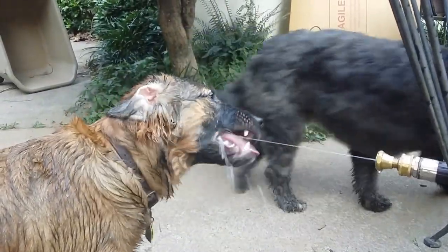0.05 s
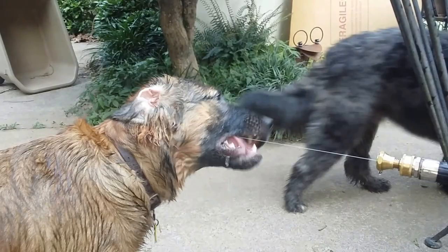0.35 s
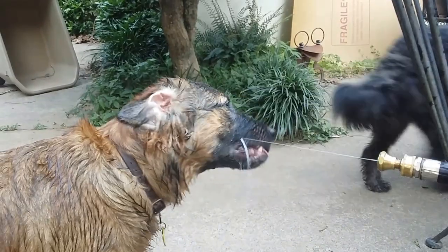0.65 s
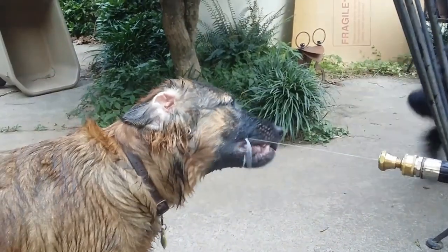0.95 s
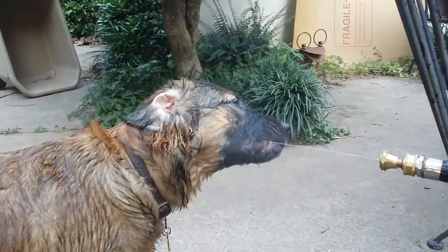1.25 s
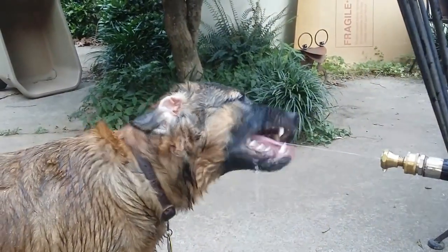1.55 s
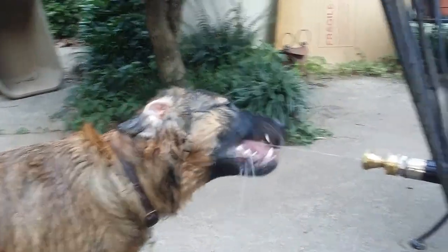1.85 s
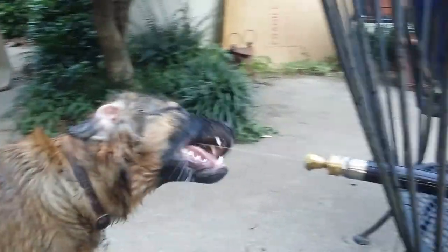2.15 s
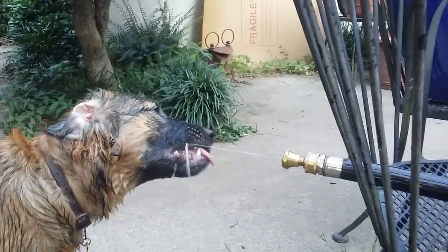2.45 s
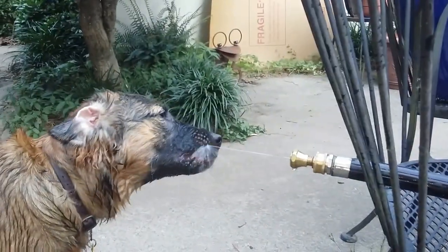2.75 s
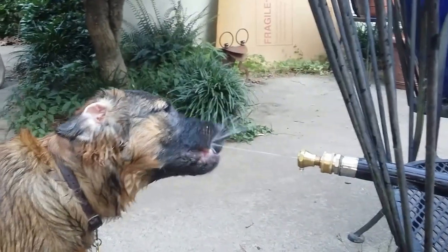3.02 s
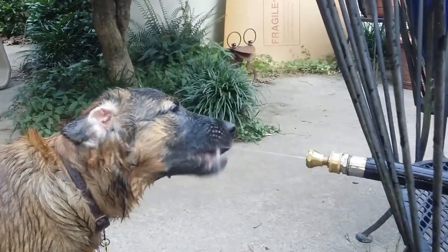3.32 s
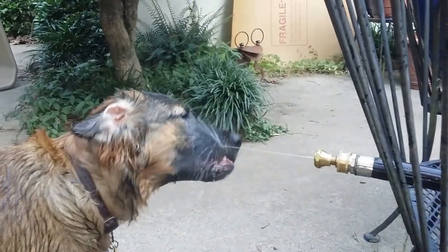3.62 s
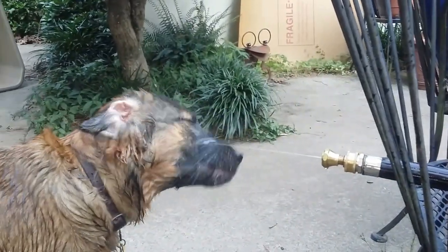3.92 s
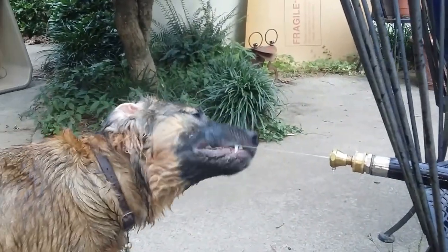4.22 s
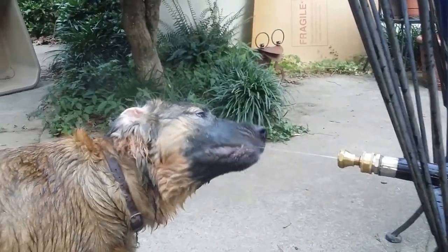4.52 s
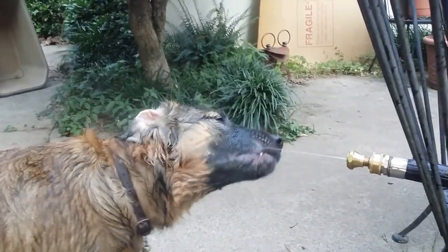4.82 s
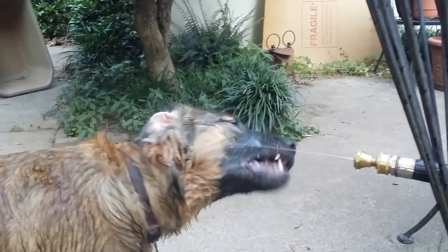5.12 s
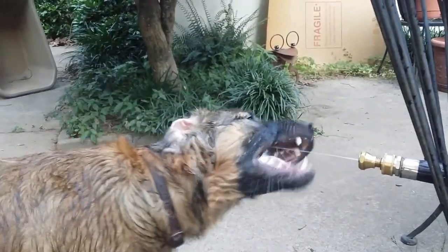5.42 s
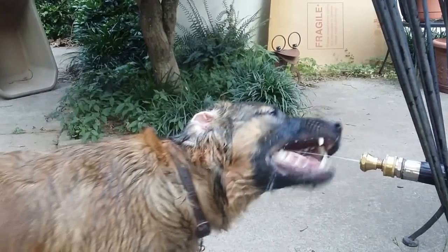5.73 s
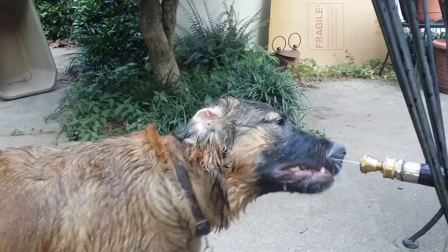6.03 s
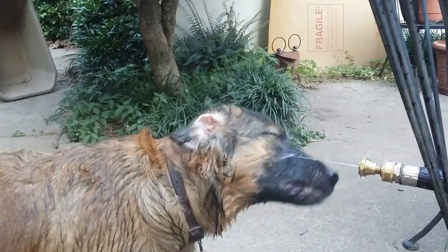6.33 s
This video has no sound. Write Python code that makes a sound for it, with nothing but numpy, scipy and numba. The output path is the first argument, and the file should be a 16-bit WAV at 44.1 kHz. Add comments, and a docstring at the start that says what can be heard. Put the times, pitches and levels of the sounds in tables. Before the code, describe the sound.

A dog laps and snaps at a thin hose jet close by, with spluttering spray, wet smacks and slurps over a faint, distant engine.

```python
"""A patio in a quiet garden: about a metre away, in mono, a dog laps and snaps at a thin hose jet.
The jet strikes muzzle and teeth in spurts and drums into small pockets of lip and cheek.
At each lap the mouth's ring rises as the jaw opens and falls to a squeak as it shuts.
Lips smack, the tongue plops, and a far engine drones past behind the garden."""
import sys
import numpy as np
from scipy import signal
from scipy.fft import rfft, irfft
from scipy.io import wavfile
from scipy.ndimage import uniform_filter1d
from numba import njit

SR = 44100
rng = np.random.default_rng(int(sys.argv[2]) if len(sys.argv) > 2 else 0)


def store_wav(level_fs):
    """Save 16-bit WAV to argv[1]."""
    pcm = np.round(np.clip(np.atleast_2d(level_fs), -1, 1) * 32767)
    wavfile.write(sys.argv[1], SR, pcm.T.astype(np.int16))


N = 285327
TIME = np.arange(N) / SR


def undb(db):
    """Decibels to gain."""
    return 10 ** (np.asarray(db) / 20)


def unit(x):
    """Scale to rms 1."""
    return x / np.sqrt(np.mean(x ** 2) + 1e-18)


def curves(table):
    """A table's columns as automation curves, one value a sample."""
    times, *columns = np.transpose(table)
    return [np.interp(TIME, times, column) for column in columns]


def colour(x, points):
    """Equalise by a curve of (pitch_hz, gain_db) points."""
    hz, db = np.transpose(points)
    bins_hz = np.fft.rfftfreq(len(x), 1 / SR)
    gain = undb(np.interp(np.log(bins_hz + 1e-3), np.log(hz), db))
    return irfft(rfft(x) * gain, len(x))


def band(x, lo_hz, hi_hz, order=2):
    """Band-pass."""
    return signal.sosfilt(signal.butter(order, [lo_hz, hi_hz], "band", fs=SR, output="sos"), x)


def walk(rate):
    """A random drift at rms 1 that takes a new course `rate` times a second."""
    step = int(SR / rate)
    held = np.repeat(rng.standard_normal(N // step + 1), step)
    return unit(uniform_filter1d(held, step)[:N])


@njit
def resonate(x, hz, width_hz):
    """State-variable band-pass whose centre can move every sample."""
    y, band_state, low_state = np.empty(len(x)), 0., 0.
    for i in range(len(x)):
        centre_hz = min(hz[i], .42 * SR)
        tuning, damping = np.tan(np.pi * centre_hz / SR), width_hz / centre_hz
        passed = (band_state + tuning * (x[i] - low_state)) / (1 + tuning * (tuning + damping))
        band_state = 2 * passed - band_state
        low_state += 2 * tuning * passed
        y[i] = damping * passed
    return y


def cavity(drive, hz, width_hz):
    """A steady or gliding resonance with steep skirts, at rms 1."""
    centre_hz = hz * np.ones(len(drive))
    ringing = resonate(drive, centre_hz, float(width_hz))
    return unit(resonate(ringing, centre_hz, 6.0 * width_hz))


def swell(start, length, rise, release_s):
    """A flow that swells over the share `rise` of its length, then dies: span, strength, progress 0-1."""
    span = slice(max(int(start * SR), 0), int((start + length + 5 * release_s) * SR))
    t = TIME[span] - TIME[span][0]
    attack = np.minimum(t / (max(rise, .01) * length), 1)
    release = np.exp(-np.maximum(t - length + release_s, 0) / release_s)
    return span, attack * release, np.minimum(t / length, 1)


def burst(x, length, db):
    """Give a short sound the energy of level `db` held for `length` seconds."""
    return undb(db) * unit(x) * np.sqrt(len(x) / (length * SR))


def droplets(rate, spread_db):
    """Drops land at random, `rate` a second; spread_db scatters their sizes."""
    hit = rng.random(N) < rate / SR
    size = undb(spread_db * np.minimum(rng.standard_exponential(N), 4))
    return unit(hit * size * rng.choice([-1, 1], N))


def jaw_strokes():
    """Each lap is two strokes: the jaw opens from parted lips to its widest, then shuts on the jet."""
    # laps: widest_s, opening_s, closing_s, widest_cavity_hz, final_cavity_hz,
    # opening_db, closing_db, spray_db, squeak_db (re closing)
    laps = [ (0.161, 0.13, 0.036, 1162, 1125, -53, -58.5, -60, 5.5),
            (.315, 0.072, 0.048, 1380, 1074, -54.5, -50.5, -37.5, -14),
            (.572, 0.026, 0.038, 1152, 850, -60, -56.5, -44, -2),
            (.925, 0.17, 0.087, 1554, 1000, -57, -44.5, -37.5, -10),
            (1.243, 0.094, 0.024, 1567, 1415, -57, -51, -42, -6),
            (1.361, 0.034, .05, 1210, 1230, -67, -54.5, -46, -17),
            (1.627, 0.12, 0.029, 1310, 1190, -57.5, -57, -54, -2),
            (1.742, 0.064, 0.076, 1650, 996, -59, -48, -44, -10),
            (2.068, 0.022, 0.068, 1597, 1050, -52, -41.5, -36.5, -26),
            (2.359, 0.1, 0.077, 1449, 962, -47, -39, -37, -7.5),
            (2.654, 0.037, .11, 1480, 920, -60, -49, -45.5, -18),
            (3.232, .03, 0.024, 1177, 964, -61, -54, -39, 1),
            (3.546, 0.055, 0.039, 1270, 937, -53, -51, -39, 1.5),
            (3.848, 0.031, 0.094, 1200, 947, -48.5, -51.5, -46.5, -22),
            (4.325, 0.061, .042, 1356, 948, -50, -53, -57, 3),
            (4.598, 0.051, 0.049, 1390, 972, -57.5, -47, -39, -2.5),
            (4.867, 0.077, 0.031, 1394, 968, -52.5, -54.5, -45, 1.5),
            (5.056, 0.041, 0.066, 1440, 1446, -59, -50.5, -44.5, -9),
            (5.158, .01, 0.034, 1043, 930, -68, -56.5, -42.5, 3),
            (5.344, 0.024, 0.066, 1600, 1304, -60.5, -48.5, -42, -12),
            (5.625, 0.18, 0.064, 1520, 1060, -48.5, -48, -39, -6),
            (5.848, 0.018, 0.06, 1557, 1362, -59.5, -53.5, -47, -12),
            (5.968, 0.017, 0.033, 1078, 1010, -76, -55, -40.5, 5),
            (6.243, 0.039, 0.0313, 1420, 1020, -56, -57.5, -40.5, -4)]
    parted_hz = 936
    for widest, open_s, close_s, wide_hz, end_hz, open_db, close_db, spray_db, squeak_db in laps:
        # start_s, length_s, rise_share, from_hz, to_hz, level_db, spray_db, squeak_db (re level)
        yield widest - open_s, open_s, 0.62, parted_hz, wide_hz, open_db, spray_db - 10.5, -9
        yield widest, close_s, 0.18, wide_hz, end_hz, close_db, spray_db, squeak_db


def jet_flows():
    """Strength of hiss, mist and froth: the grazing jet, strikes and jaw strokes add their power."""
    # the jet grazes the fur, until the dog moves up to the nozzle: time_s, level_db
    graze = [(0, -40), (.55, -53), (2.3, -49), (2.8, -50), (3.3, -51), (4.1, -43), (4.8, -48.5),
             (5.8, -44.5), (5.95, -55), (6.47, -60)]
    # the jet strikes muzzle, teeth or tongue:
    # start_s, length_s, rise_share, release_s, level_db, mist_db, froth_db (both re level)
    strikes = [(0.0, 0.13, 0.57, 0.011, -32.5, 0, -8), (0.11, 0.062, 0.67, 0.0084, -36.5, -7, -1),
               (0.227, 0.057, 0.44, 0.02, -41, -11.0, -7), (0.357, 0.16, 0.03, 0.096, -42, -8.5, 1),
               (0.585, 0.15, 0.26, 0.011, -42, -8, -5), (0.67, 0.18, 0.6, 0.025, -33.5, -2, -3),
               (1.022, 0.157, 0.33, 0.038, -33.0, -4.5, -5), (1.296, 0.1, 0.08, 0.031, -40.5, -7, -10),
               (1.411, 0.17, 0.47, 0.006, -37, -5, -4.5), (1.553, 0.085, 0.82, 0.011, -34.5, -3.0, -1.5),
               (1.74, 0.12, 0.9, 0.036, -33.5, -12.0, -4.5), (1.82, 0.15, 0.57, 0.024, -34, -11, -6.5),
               (2.142, 0.12, 0.72, 0.025, -38.5, -6, 0.5), (2.43, 0.16, 0.12, 0.07, -44, -8.0, 0.5),
               (2.602, 0.057, 0.88, 0.004, -38, -3.0, -1), (2.88, 0.16, 0.84, 0.055, -32.0, -1.5, -19),
               (3.1, 0.088, 0.9, 0.06, -36.5, -8, -6.5), (3.325, 0.058, 0.13, 0.019, -41, -3.5, -8),
               (3.419, 0.093, 0.13, 0.0087, -45.5, -0.5, -8), (3.61, 0.13, 0.55, 0.054, -31.5, -5.0, -15.5),
               (3.744, 0.1, 0.2, 0.027, -50.5, 1, -17), (3.97, 0.17, 0.98, 0.064, -27, -12, -9),
               (4.192, 0.12, 0.62, 0.033, -38, -7, -6), (4.39, 0.081, 0.48, 0.043, -39, -2.5, -8),
               (4.515, 0.04, 0.32, 0.033, -40, -12, -5.0), (4.662, 0.039, 0.52, 0.011, -41, -3.0, -16),
               (4.72, 0.099, 0.1, 0.011, -55, 4, -21), (4.93, 0.14, 0.9, 0.005, -41.5, -5.5, -20),
               (5.21, 0.11, 0.56, 0.032, -37.5, -6.5, -4), (5.44, 0.097, 0.64, 0.013, -36.5, -5.0, -6.5),
               (5.704, 0.13, 0.14, 0.017, -36.0, -7, -8.0), (6.09, 0.085, 0.96, 0.069, -37.5, -1.5, -24),
               (6.32, 0.04, 0.15, 0.18, -39, -0.5, -32), (6.418, 0.054, 0.67, 0.015, -34, -14, -11)]
    graze_db, = curves(graze)
    graze_mix = undb([0, -7, -12])  # hiss, mist, froth
    power = np.outer(graze_mix, undb(graze_db + 4.5 * walk(25))) ** 2
    lap_sprays = [(start, length, rise, .012, db, -17.5, -2)  # same columns as the strikes
                  for start, length, rise, _, _, _, db, _ in jaw_strokes()]
    for start, length, rise, release_s, db, mist_db, froth_db in list(strikes) + lap_sprays:
        span, flow, _ = swell(start, length, rise, release_s)
        power[:, span] += np.outer(undb([db, db + mist_db, db + froth_db]), flow) ** 2
    return np.sqrt(power)


def shifting_gap(drive, hz, width_hz, drift, rate):
    """A gap that keeps changing size and only rings now and then, when the water finds it."""
    ringing = cavity(drive, hz * np.exp(drift * walk(rate)), width_hz)
    wetting_db = 4.0 * np.clip(walk(35), -2, 1)
    return unit(ringing * undb(wetting_db))


def bubbles(count=5000, decay_cycles=7):
    """Froth: thousands of tiny trapped bubbles, each a slightly rising ping of a few cycles."""
    out, t = np.zeros(N + SR // 40), TIME[:SR // 40]
    for when, pitch, size in rng.random((count, 3)):
        hz = 2000 * 3.5 ** pitch
        age = t * hz / decay_cycles
        ping = np.sin(2 * np.pi * hz * t * (1 + .015 * np.minimum(age, 2))) * np.exp(-age)
        onset = int(when * N)
        out[onset:onset + len(t)] += undb(-2.2 * np.log(size + .02)) * ping
    return unit(out[:N])


def jet():
    """The jet breaks into drops on the muzzle; teeth make mist, soft flesh a lower, frothy splash."""
    # tone of the spray: pitch_hz, gain_db
    spray_tone = [(2500, -12), (4400, 5), (5400, 1), (6400, 4), (7300, 5.5), (8500, 1), (9800, -3.5),
                  (13000, -6.5), (15500, -10.5)]
    # folds of lip and gum that the froth rings: pitch_hz, width_hz, level_db
    fold_modes = [(2220, 300, -23.5), (3750, 105, -15), (4580, 90, -8)]
    hiss_flow, mist_flow, froth_flow = jet_flows()
    clumps = undb(1.2 * walk(130))
    impacts = droplets(rate=3500, spread_db=3.0) + undb(-8.5) * rng.standard_normal(N)
    spatter = colour(clumps * impacts, spray_tone)
    hiss = undb(-1.5) * unit(band(spatter, 5300, 10970, order=3))
    teeth = undb(-11.0) * shifting_gap(spatter, hz=7360, width_hz=900, drift=0.078, rate=20)
    crackle = colour(clumps * droplets(rate=3000, spread_db=3.6), spray_tone)
    mist = undb(1.6 + 1.3 * walk(30)) * unit(band(spatter + crackle, 9800, 15900, order=4))
    drops = droplets(rate=2200, spread_db=4.0)
    flesh = undb(-5.5) * unit(band(drops, 3040, 5930, order=3))
    folds = sum(undb(db) * shifting_gap(drops, hz, width_hz, drift=0.12, rate=16)
                for hz, width_hz, db in fold_modes)
    patter = undb(-14.5) * unit(band(droplets(rate=1300, spread_db=-1.5), 860, 3200))
    froth = flesh + folds + patter + undb(-7) * bubbles()
    splutter = undb(1.2 * walk(30) - 1.07)
    return splutter * (hiss_flow * (hiss + teeth) + mist_flow * mist + froth_flow * froth)


def engine(smear=0.499, fade_db=2.5, boom_octaves=0.27):
    """Distant firings throb and slow; only harmonics near the boom arrive, each fading in and out."""
    # the far engine's pass: time_s, firing_hz, level_db, boom_hz
    drive_by = [(0, 34.3, -58.5, 167), (.88, 35.3, -53.5, 143), (1.46, 34.5, -54, 120),
                (1.86, 33.7, -52.5, 107), (2.03, 33.55, -49, 127), (2.25, 33.9, -49.5, 116.7),
                (3.7, 31.24, -58, 117), (3.91, 30.27, -53.5, 134), (4.16, 29.1, -49, 120),
                (4.47, 29, -53.5, 100), (4.63, 27.87, -55.5, 121), (5.24, 28.16, -54, 105),
                (5.45, 28.54, -68, 92), (6.47, 27, -67, 105.5)]
    firing_hz, level_db, boom_hz = curves(drive_by)
    phase = 2 * np.pi * np.cumsum(firing_hz) / SR
    orders = np.arange(2, 7)[:, None]
    fades = np.array([undb(fade_db * walk(5.01)) for _ in orders])
    weights = fades / (1 + (np.log2(orders * firing_hz / boom_hz) / boom_octaves) ** 2)
    weights /= np.sqrt(np.sum(weights ** 2, axis=0) / 2)
    harmonics = np.cos(orders * phase + smear * orders ** 2)  # the long path smears each firing
    return undb(level_db) * np.sum(weights * harmonics, axis=0)


def garden():
    """A noise bed of outdoor rumble and run-off trickling on the concrete, with a faint steady hum."""
    # tone of the garden bed: pitch_hz, gain_db
    bed_tone = [(25, -21), (45, -0.5), (65, 6), (110, 5), (230, 1.5), (330, -4.5), (580, -2.5), (800, -9),
                (1000, -6.5), (1600, -9.5), (2600, -10.5), (4000, -17), (7300, -6), (15500, -19.5)]
    air = unit(colour(rng.standard_normal(N), bed_tone)) * undb(.5 * walk(5.4))
    hum = cavity(rng.standard_normal(N), hz=225.7, width_hz=18)
    return undb(-50) * air + undb(-65) * hum


def whistle(hz, flow, wander):
    """Flow across a narrow gap locks onto the cavity and gives a short, unsteady whistle."""
    jitter = unit(uniform_filter1d(rng.standard_normal(len(hz)), SR // 500))
    phase = 2 * np.pi * np.cumsum(hz * (1 + wander * jitter)) / SR
    return unit(flow * np.sin(phase))


def mouth(drive, hz, flow):
    """Water rattles in the mouth; its resonances rise as the jaw opens and fall as the lips close."""
    # mouth resonances, jaw half open: pitch_hz, share of the cavity's glide, width_hz, level_db
    modes = [(1190, 1, 194, 0.5), (1470, 0.45, 200, -1), (2355, 0.54, 190, 1), (2774, 0.31, 240, -2.5),
             (4000, 0.6, 1040, -1)]
    half_open_hz = modes[0][0]
    fizz = undb(-15) * unit(band(drive, 2700, 17000))
    slosh = undb(-16) * unit(band(drive, 440, 1340))
    sound = fizz + slosh + undb(-1) * whistle(hz, flow, wander=0.06)
    for mode_hz, share, width_hz, db in modes:
        sound += undb(db) * cavity(drive, mode_hz * (hz / half_open_hz) ** share, width_hz)
    return sound


def slurps(squeak_hz=985, squeak_octaves=.3):
    """Each jaw stroke sweeps the mouth and squeaks where the lips nearly meet; gulps ring it lower."""
    # water gurgles in the mouth between laps: start_s, length_s, from_hz, to_hz, level_db
    gulps = [(.603, 0.068, 695, 580, -58), (1.405, .012, 784, 460, -66), (1.654, 0.037, 923, 1036, -57.5),
             (1.972, .09, 554, 850, -51.5), (3.171, 0.042, 828, 1020, -59), (3.337, 0.032, 1002, 983, -62),
             (3.779, 0.114, 433, 562, -55.5), (4.909, 0.0306, 843, 568, -59.5),
             (5.205, 0.058, 735, 656, -63), (5.52, 0.108, 562, 643, -56)]
    water = droplets(rate=2200, spread_db=2.5) * undb(2.1 * walk(130))
    out = np.zeros(N)
    for start, length, rise, from_hz, to_hz, db, _, squeak_db in jaw_strokes():
        span, flow, progress = swell(start, length, rise, release_s=0.0078)
        hz = from_hz * (to_hz / from_hz) ** progress
        pursed = np.exp(-(np.log2(hz / squeak_hz) / squeak_octaves) ** 2)
        out[span] += burst(mouth(water[span] * flow, hz, flow), length, db)
        out[span] += burst(whistle(hz, flow * pursed, wander=0.054), length, db + squeak_db)
    for start, length, from_hz, to_hz, db in gulps:
        span, flow, progress = swell(start, length, rise=0.081, release_s=0.021)
        hz = from_hz * (to_hz / from_hz) ** progress
        out[span] += burst(mouth(water[span] * flow, hz, flow), length, db)
    return out


def squirts(relative_width=0.11):
    """Drops drum into one small pocket, which sings higher as it fills and lower as it opens."""
    # the jet caught in a pocket of lip or cheek: start_s, length_s, from_hz, to_hz, level_db
    catches = [ (0.077, 0.054, 3060, 3570, -43.5), (0.13, 0.043, 3770, 5800, -51),
               (0.194, 0.052, 1870, 2200, -52.5), (0.262, 0.023, 7000, 7500, -36.5),
               (0.306, 0.061, 2250, 1460, -45.5), (.332, 0.034, 4530, 3260, -51),
               (0.417, 0.077, 2150, 2480, -45.5), (0.667, 0.045, 5700, 5000, -43),
               (0.743, 0.11, 4360, 3520, -44), (1.078, 0.088, 3440, 3340, -43.5),
               (1.349, 0.026, 3160, 1980, -53), (1.417, 0.137, 5760, 4600, -45.5),
               (1.556, 0.056, 2290, 3100, -49.5), (1.895, 0.023, 3150, 2670, -49),
               (1.923, 0.097, 4670, 4340, -47), (2.114, 0.077, 7800, 6700, -43),
               (2.196, 0.027, 6000, 4700, -42), (2.23, 0.044, 2300, 3230, -50),
               (2.237, 0.069, 2080, 2730, -48.5), (2.49, 0.0964, 3040, 2650, -49),
               (2.657, 0.037, 2350, 3420, -46.5), (3.237, 0.014, 2390, 2250, -46),
               (3.562, 0.031, 2500, 2210, -47.5), (4.321, 0.023, 2300, 2050, -53),
               (4.611, .039, 2477, 2080, -48), (4.818, .07, 2550, 2380, -52),
               (5.24, 0.063, 5100, 5700, -49), (4.15, 0.038, 2900, 2720, -49), (5.74, .11, 2170, 2300, -52),
               (6.244, 0.0093, 2560, 2460, -48.5), (6.445, 0.025, 2800, 2880, -50.5)]
    water, out = droplets(rate=2400, spread_db=2.0), np.zeros(N)
    for start, length, from_hz, to_hz, db in catches:
        span, flow, progress = swell(start, length, rise=0.15, release_s=0.0027)
        hz = from_hz * (to_hz / from_hz) ** progress
        pocket = cavity(water[span] * flow, hz, relative_width * from_hz)
        out[span] += burst(pocket, length, db)
    return out


def smacks(snap_s=.0016, spray_db=-10, body_db=-8, trim_db=-2):
    """A wet film snaps with a short bright ring over a duller body, and throws a little spray."""
    # lip smacks and tooth clicks: start_s, level_db (before trim), ring_hz, spray_t60_s
    hits = [(0.1034, -27, 7810, 0.03), (0.1647, -15, 6570, 0.018), (0.248, -30, 7000, 0.03),
            (0.492, -22, 7550, 0.034), (1.2483, -30, 6260, 0.049), (1.369, -22.5, 6900, 0.026),
            (1.407, -17.5, 6200, 0.012), (3.337, -40, 7600, 0.03), (3.4727, -22, 5700, 0.023),
            (3.5057, -26.5, 7060, 0.021), (3.6326, -24, 7040, 0.03), (3.8715, -25.5, 3670, 0.024),
            (4.0586, -31, 7300, 0.045), (4.267, -27, 6940, 0.034), (4.6828, -36, 6980, 0.03),
            (5.6604, -26, 7200, 0.11), (6.0733, -34.5, 6210, 0.043), (6.0882, -33, 6300, 0.042),
            (6.246, -39, 2560, 0.036), (6.329, -25, 8200, 0.017)]
    out = np.zeros(N)
    snap_noise, spray_noise = rng.standard_normal((2, N))
    for start, db, hz, t60_s in hits:
        span = slice(int(start * SR), int(start * SR) + SR // 10)
        t = TIME[span] - TIME[span][0]
        bright = cavity(snap_noise[span], hz, width_hz=1330)
        body = undb(body_db) * cavity(snap_noise[span], 0.78 * hz, width_hz=1000)
        snap = (bright + body) * np.exp(-t / snap_s)
        spray = unit(band(spray_noise[span], 2900, 12300)) * undb(-60 * t / t60_s)
        out[span] += undb(db + trim_db) * (snap + undb(spray_db) * spray)
    return out


def plops(attack_s=0.00057, t60_s=0.046, glide=0.075, wet_db=-5):
    """The tongue pulls free and a pocket of air rings, rising a little."""
    # tongue plops: start_s, level_db, pitch_hz
    pulls = [(1.369, -33, 1223), (1.411, -41, 357), (2.006, -34.5, 534), (2.28, -33.5, 1006),
             (2.479, -42, 1630), (2.823, -42, 561.4), (2.914, -46.5, 1370), (3.43, -40, 637),
             (3.624, -44.5, 552), (3.779, -34.5, 630), (3.893, -31.5, 1024), (4.207, -43.5, 1080),
             (4.76, -38.5, 670), (6.072, -37.5, 1255), (6.388, -44, 558)]
    out, noise = np.zeros(N), rng.standard_normal(N)
    for start, db, hz in pulls:
        span = slice(int(start * SR), int(start * SR) + SR // 12)
        t = TIME[span] - TIME[span][0]
        pocket = np.sin(2 * np.pi * hz * t * (1 + glide * t / t60_s))
        wet = undb(wet_db) * unit(band(noise[span], 330, 2000))
        envelope = (1 - np.exp(-t / attack_s)) * undb(-60 * t / t60_s)
        out[span] += undb(db) * (pocket + wet) * envelope
    return out


def patio(x, t60_s=0.16, predelay_s=.006, tail_db=-20):
    """A few close reflections, then a thin scatter from concrete, walls and plants."""
    # reflections off things close to the microphone: delay_s, signed_gain
    echoes = [(.001814, -0.15), (.002005, 0.21), (.00338, 0.044), (.00473, -0.29)]
    t = TIME[:SR // 2]
    scatter = band(rng.standard_normal(len(t)), 290, 3800)
    response = scatter * undb(-60 * t / t60_s) * (t > predelay_s)
    response *= undb(tail_db) / np.linalg.norm(response)
    for delay_s, gain in echoes:
        response[int(round(delay_s * SR))] += gain
    return x + signal.fftconvolve(x, response)[:N]


def scene():
    """The dog close by under a spluttering jet, the garden behind; both channels alike."""
    dog = jet() + slurps() + squirts() + smacks() + plops()
    mono = patio(dog) + engine() + garden()
    return np.array([mono, mono])


def record(dry):
    """The camera microphone cuts the deep bass and the very top."""
    low_cut = signal.butter(8, 48, "high", fs=SR, output="sos")
    high_cut = signal.ellip(10, .2, 80, 15900, fs=SR, output="sos")
    return signal.sosfilt(high_cut, signal.sosfilt(low_cut, dry))


dry = scene()
out = record(dry)
store_wav(out)
```